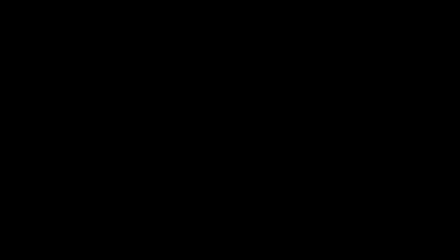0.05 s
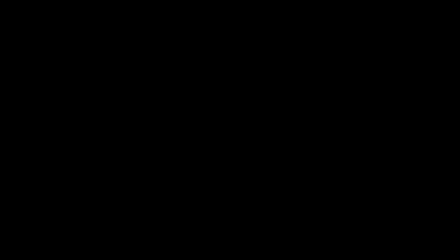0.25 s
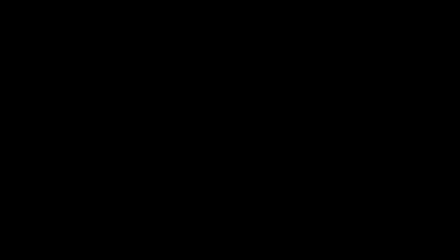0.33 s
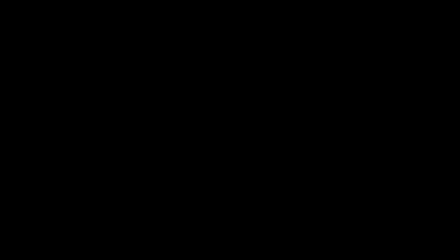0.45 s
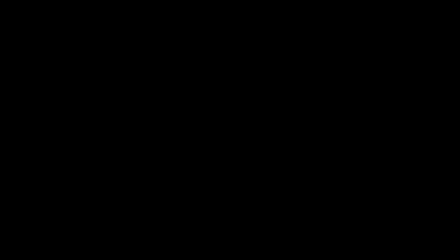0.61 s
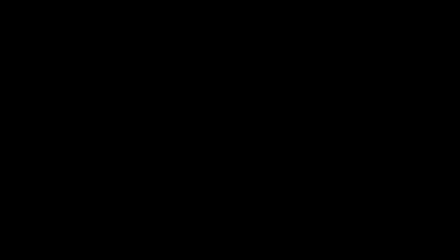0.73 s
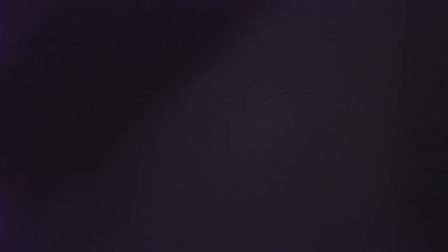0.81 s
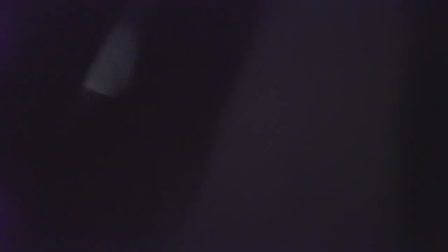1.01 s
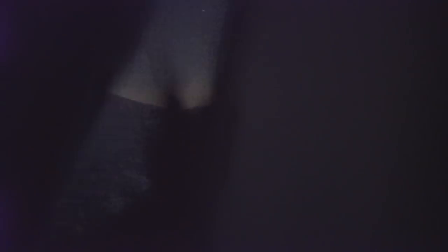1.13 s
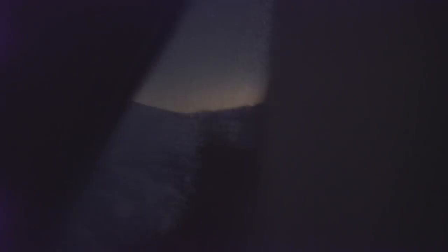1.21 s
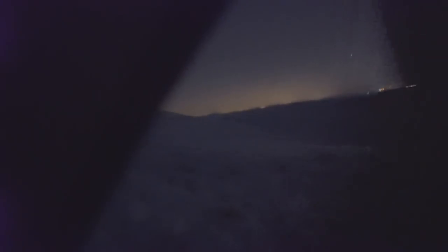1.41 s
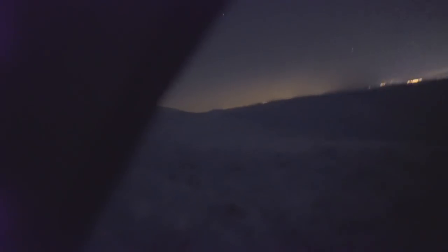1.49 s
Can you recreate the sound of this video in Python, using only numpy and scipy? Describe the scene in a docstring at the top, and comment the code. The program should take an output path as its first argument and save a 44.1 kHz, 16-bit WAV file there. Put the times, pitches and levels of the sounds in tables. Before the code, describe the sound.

Heard up close inside a tent, a zipper opens with a scraping buzz that rises in pitch and ends on a small metallic tick. The door flap then swishes and crinkles twice against a faint, steady hiss.

```python
"""A tent zipper is pulled open close by, faster and louder: the slider scrapes and snaps over the
teeth, the taut fabric buzzes at the tooth rate, and the metal pull tab ticks at the stop.
Then the nylon door is pushed aside in two rustling sweeps, its creases popping.
The tent walls stir and echo briefly. The night is still, with only a faint hiss."""
import sys
import numpy as np
from scipy import signal
from scipy.fft import rfft, irfft, next_fast_len
from scipy.io import wavfile
from scipy.ndimage import map_coordinates

SR = 44100
rng = np.random.default_rng(int(sys.argv[2]) if len(sys.argv) > 2 else 0)


def wrap_up_sound(samples):
    """Save the sound to the file named by the first command line argument, as 16-bit audio."""
    columns = np.atleast_2d(samples).T
    # keep every value between -1 and 1, then stretch to whole-number steps
    tamed = np.clip(columns, -1, 1)
    steps = np.round(tamed * 32767).astype(np.int16)
    wavfile.write(sys.argv[1], SR, steps)


N = 68355

# Noise spectra. Each row: frequency in Hz, relative density in dB.
NIGHT_SPECTRUM = [(25, -26), (70, -18), (150, -24), (500, -5), (1500, -4.5), (4000, -2.5), (11000, 1),
                  (16000, -2.5)]
WALL_SPECTRUM = [(25, -8), (70, 1), (130, 2), (250, 6), (500, -14)]
SWISH_SPECTRUM = [(100, -39), (400, -21), (1000, -13.5), (2000, -4.5), (3300, -1), (5000, 1), (7500, -6),
                  (9500, -11.5), (12000, -5.5), (16000, -18)]
CRUMPLE_SPECTRUM = [(40, -32), (150, -24.5), (350, -9), (700, -6), (1100, 0), (1700, -1), (3000, -5),
                    (6000, -20), (15000, -22)]
SHEEN_SPECTRUM = [(1000, -43), (4500, -9), (7500, -1.5), (11500, -1.5), (14000, -2), (16000, -4.5)]
SCRAPE_SPECTRUM = [(100, -41), (300, -15), (600, -12.5), (1100, -3.5), (2200, -2.5), (3200, -3),
                   (5200, 2.5), (7000, -1.5), (9300, -7), (11400, -0.5), (13000, -5.5), (16000, -9.5)]
# Stereo likeness of the noises. Each row: frequency in Hz, left-right correlation.
NIGHT_CORR = [(150, 1), (2000, 0.17), (9000, 0.079)]
WALL_CORR = [(100, 0.99)]
SWISH_CORR = [(500, 1), (2500, 0.74), (6000, 0.46), (12000, 0.1)]
CRUMPLE_CORR = [(200, 1), (1500, 0.85), (6000, 0.21)]
SHEEN_CORR = [(5000, 0.16), (12000, 0.14)]
SCRAPE_CORR = [(500, 1), (2000, 0.25), (5000, 0.17), (9000, 0.11), (15000, 0.22)]
# Stereo width of tent echo and tooth clicks. Each row: frequency in Hz, side gain in dB.
ECHO_WIDTH = [(150, -27), (600, 0.5), (2000, -2)]
CLICK_WIDTH = [(400, -11), (1000, -47), (2000, -6), (4000, -18), (10000, 3.5)]
# Position of zipper and door. Each row: time in seconds, left minus right in dB.
NEAR_PAN = [(0, 2), (.3, 1.5), (.45, 1), (.65, -0.8), (.75, -2), (.83, -2), (.93, -1.5), (1.12, 1.5),
            (1.2, -3), (1.31, -7), (1.48, -7), (1.55, -4)]

# Stir of the tent wall. Each row: time in seconds, level in dB.
WALL_LEVELS = [(0, -94), (.13, -96), (.2, -83), (.42, -79), (.5, -78), (.75, -63), (1.0, -67), (1.08, -89),
               (1.2, -86), (1.33, -96), (1.5, -68)]
# Tugs on the wall. Each row: centre in seconds, level in dB, half-width in seconds.
WALL_TUGS = [(0.554, -61, .02), (.715, -58, .012), (0.78, -75, .012), (0.922, -61, .007),
             (0.996, -71, 0.018), (1.274, -67, 0.0092)]
# Decay inside the tent. Each row: frequency in Hz, T60 in seconds.
TENT_DECAY = [(300, 0.093), (2000, 0.069), (10000, 0.034)]
# Door sweeps. Each row: time in seconds, then swish, crumple and sheen levels in dB.
DOOR_LEVELS = [(.79, -59, -23, -55), (.825, -41.5, -39, -39), (.875, -49, -49, -41), (.90, -43, -45, -40.5),
               (.925, -39.5, -36.5, -35), (.965, -34, -38.5, -37), (1.0, -31.5, -36.5, -34),
               (1.035, -33, -55, -42), (1.06, -31, -42.5, -41), (1.12, -34, -47.5, -37.5),
               (1.15, -28, -43.5, -33), (1.172, -40.5, -76, -33.5), (1.195, -36.5, -65, -35),
               (1.23, -53, -48.5, -46.5), (1.3, -61, -68, -73), (1.38, -51.5, -56, -49),
               (1.43, -44.5, -49.5, -40.5), (1.46, -43.5, -47.5, -36), (1.495, -36.5, -41.5, -32.5),
               (1.52, -39, -44, -36), (1.55, -42.5, -44.5, -35.5)]
# Snapping creases. Each row: start in seconds, peak in dB, centre in Hz, half-width in octaves.
CREASE_POPS = [(.832, -26, 2430, 0.45), (.862, -25.5, 1270, 0.69), (.898, -32, 2600, 0.93),
               (0.903, -34, 2170, 0.8), (0.913, -43, 305, 1.06), (.919, -26, 1550, 0.47),
               (0.9333, -23, 3560, 1.5), (.971, -23, 1600, 1.3), (1.102, -23, 3200, 0.88),
               (1.134, -23, 3750, 0.4), (1.268, -48, 533, 0.42), (1.316, -51, 1170, 0.25),
               (1.407, -33, 1500, 1.2), (1.439, -28.5, 1750, .7), (1.474, -25.5, 2510, 1.2),
               (1.489, -29, 2380, 1.1), (1.504, -33, 2010, 0.5)]

# Pull tab strikes. Each row: start in seconds, peak in dB, left minus right in dB.
TAB_STRIKES = [(.8072, -16, -15), (0.812, -22, 13), (0.8154, -27, 4)]
# Pull tab modes. Each row: frequency in Hz, relative level in dB, T60 in seconds.
TAB_RING = [(11270, -9.5, 0.03), (11500, -0.5, 0.011), (12150, -4.5, 0.01)]
# Fabric buzz. Each row: time in seconds, fundamental in dB, overtones in dB.
BUZZ_LEVELS = [(0, -60, -45), (.05, -70, -50.5), (.095, -55, -40), (.16, -47.5, -58), (.20, -41.5, -38.5),
               (.228, -44.5, -36), (.265, -47, -38.5), (.34, -44, -39.5), (.405, -46, -31.5),
               (.46, -49, -29.5), (.505, -35, -25.5), (.545, -42, -51), (.585, -46, -41),
               (.615, -33, -27.5), (.67, -30, -28), (.705, -28, -26.5), (.734, -23.5, -23),
               (.757, -33, -34), (.785, -30.5, -23.5), (.80, -26.5, -25), (.818, -53, -35.5)]
# Resonances of fabric, tooth on tape, tooth on slider. Each row: frequency in Hz, relative gain in dB.
BUZZ_BODY = [(500, -7), (700, -4), (900, 4), (1100, 3), (1400, 1.5), (1750, -4), (2200, -8), (2700, -2),
             (3400, 0.5), (4200, -2.5), (5200, -12), (6000, -27)]
KNOCK_BODY = [(100, -64), (250, -34), (450, -22), (650, -13.5), (900, -3.5), (1150, -6.5), (1500, 0),
              (2100, 2.5), (2800, -4.5), (4000, -12), (7000, -17.5), (16000, -32)]
SNAP_BODY = [(100, -55), (700, -8.5), (2000, -14), (3100, -5.5), (4100, 4.5), (5200, -2), (7000, -7),
             (9000, -14), (11500, -22), (16000, -16)]
# Unevenness of the teeth. Each row: time in seconds, rms timing scatter in ms.
TOOTH_SCATTER = [(0, .05), (.39, .055), (.44, .16), (.57, .15), (.63, .09), (.69, .045), (.74, .033),
                 (.8, .024)]
# Slider speed. Each row: time in seconds, teeth per second.
TOOTH_RATE = [(0.0, 290), (0.036, 355), (0.084, 367), (0.114, 437), (0.142, 476.2), (0.166, 430),
              (0.196, 329), (0.23, 399), (0.278, 292), (0.334, 420.1), (0.412, 517), (0.448, 365),
              (0.492, 500), (0.506, 429), (0.576, 380), (0.606, 399), (0.64, 568), (0.666, 531.4),
              (0.694, 700), (0.712, 714.6), (0.734, 917), (0.788, 823.9), (0.804, 680), (0.808, 641.9),
              (0.814, 550), (0.82, 210)]
# The pull. Each row: time in seconds, then knock, snap and scrape levels in dB.
PULL_LEVELS = [(0, -41.5, -73, -37.5), (.13, -39, -45, -34), (.24, -59, -43, -30.5), (.31, -36, -43, -29.5),
               (.37, -39.5, -37, -26.5), (.41, -39, -35, -24.5), (.46, -32, -41, -22.5),
               (.51, -27.5, -27, -22.5), (.55, -25, -24, -23), (.60, -22.5, -23, -27.5),
               (.645, -25, -23, -20), (.675, -25, -19, -24), (.725, -25.5, -19.5, -25.5),
               (.755, -33, -23.5, -23), (.775, -27.5, -19.5, -24.5), (.795, -20, -34, -20),
               (.806, -33.5, -44, -25), (.83, -36, -49, -69)]


def amp(db):
    """Decibels to gain."""
    return 10 ** (np.asarray(db) / 20)


def unit_rms(x):
    """Scale to rms 1."""
    return x / np.sqrt(np.mean(x ** 2) + 1e-20)


def at_hz(rows, hz):
    """Interpolate a table over log frequency."""
    knots_hz, values = np.transpose(rows)
    return np.interp(np.log(hz + 1), np.log(knots_hz + 1), values)


def curves(rows):
    """One value per sample for each column after the time."""
    knots_s, *columns = np.transpose(rows)
    return [np.interp(np.arange(N) / SR, knots_s, column) for column in columns]


def wobble(rate_hz):
    """Smooth random curve, rate_hz knots a second."""
    return map_coordinates(rng.standard_normal(4096), [np.arange(N) * rate_hz / SR + 2], mode="wrap")


def filtered(x, response):
    """Apply a frequency response."""
    size = next_fast_len(N + SR // 2)
    return irfft(rfft(x, size) * response(np.fft.rfftfreq(size, 1 / SR)), size)[..., :N]


def minimum_phase(db):
    """Response with these gains that rings only after the blow."""
    cepstrum = irfft(np.log(amp(db)))
    half = len(cepstrum) // 2
    return np.exp(rfft(np.r_[cepstrum[0], 2 * cepstrum[1:half], np.zeros(half)]))


def pan_gains(db):
    """Left and right gains for a level difference."""
    return amp(np.array([db, -db]).reshape(2, -1) / 2)


def stereo(mid, side):
    """Mid and side to left and right."""
    return np.array([mid + side, mid - side])


def noise(spectrum, correlation, grain=1):
    """Stereo noise of rms 1, broken into grains, then coloured."""
    def response(hz):
        angle = np.arccos(np.clip(at_hz(correlation, hz), -1, 1)) / 2
        return amp(at_hz(spectrum, hz)) * [np.cos(angle), np.sin(angle)]
    return unit_rms(stereo(*filtered(grain * rng.standard_normal((2, N)), response)))


def add(out, start_s, x):
    """Mix x into out from start_s on."""
    part = out[..., round(start_s * SR):][..., :x.shape[-1]]
    part += x[..., :part.shape[-1]]


def night_hiss(level_db=-44.5):
    """Faint, steady hiss."""
    return amp(level_db) * noise(NIGHT_SPECTRUM, NIGHT_CORR)


def wall():
    """The tent wall stirs and thumps softly at each tug."""
    t = np.arange(N) / SR
    tugs = sum(amp(db) * np.exp(-((t - centre_s) / width_s) ** 2) for centre_s, db, width_s in WALL_TUGS)
    stir = amp(curves(WALL_LEVELS)[0] + 2.522 * wobble(22.3))
    return (stir + tugs) * noise(WALL_SPECTRUM, WALL_CORR)


def tent_echo(x, level_db=-11):
    """Brief reflections off the walls; treble dies first."""
    hz, t, bins = signal.stft(rng.standard_normal((2, SR // 5)), SR, nperseg=128)
    decay = amp(-60 * t / at_hz(TENT_DECAY, hz)[:, None])
    tail = signal.istft(bins * decay, SR, nperseg=128)[1]
    mid, side = signal.fftconvolve(x.mean(axis=0)[None], tail / np.linalg.norm(tail), axes=1)[:, :N]
    side = filtered(side, lambda hz: amp(at_hz(ECHO_WIDTH, hz)))
    return amp(level_db) * stereo(mid, side)


def fold_echoes(x, t60_s, drift_hz, count=14):
    """Very short echoes off nearby fabric, drifting between random paths."""
    t = np.arange(SR // 100) / SR
    paths = rng.standard_normal((count, len(t))) * amp(-60 * t / t60_s)
    shares = np.array([wobble(drift_hz) for _ in paths])
    shares /= np.linalg.norm(shares, axis=0)
    return sum(share * signal.fftconvolve(x, path / np.linalg.norm(path))[:N]
               for share, path in zip(shares, paths))


def door(onset_s=0.013):
    """Nylon slides on nylon with a swish and a sheen of fine hiss; its folds crumple."""
    swish_db, crumple_db, sheen_db = curves(DOOR_LEVELS)
    swish = noise(SWISH_SPECTRUM, SWISH_CORR, grain=amp(3 * wobble(1800) + 0.87 * wobble(130)))
    crumple = noise(CRUMPLE_SPECTRUM, CRUMPLE_CORR, grain=amp(3.1 * wobble(900) + 2.1 * wobble(120)))
    sheen = noise(SHEEN_SPECTRUM, SHEEN_CORR, grain=amp(2.5 * wobble(2500)))
    fade_in = np.clip((np.arange(N) / SR - DOOR_LEVELS[0][0]) / onset_s, 0, 1)
    return fade_in * (amp(swish_db) * swish + amp(crumple_db) * crumple + amp(sheen_db) * sheen)


def creases(skirt_db=-12, echo_db=-5):
    """Single creases pop through, each at its own pitch."""
    pops, hz = np.zeros(N), np.fft.rfftfreq(2048, 1 / SR)
    for start_s, db, centre_hz, width_oct in CREASE_POPS:
        detune = np.log2((hz + 1) / centre_hz) / width_oct
        pop = irfft(minimum_phase(skirt_db * np.log2(1 + detune ** 2)))
        add(pops, start_s, amp(db) * pop / np.abs(pop).max())
    echoes = np.array([fold_echoes(pops, t60_s=0.011, drift_hz=11.98) for _ in range(2)])
    return pops + amp(echo_db) * echoes


def pull_tab(attack_s=0.00025):
    """The metal tab chatters against the stopping slider."""
    out, t = np.zeros((2, N)), np.arange(SR // 20) / SR
    for start_s, db, pan_db in TAB_STRIKES:
        ring = sum(amp(mode_db - 60 * t / t60_s) * np.sin(2 * np.pi * (hz * t + rng.random()))
                   for hz, mode_db, t60_s in TAB_RING)
        ring *= 1 - np.exp(-t / attack_s)
        add(out, start_s, amp(db) * pan_gains(pan_db) * ring / np.abs(ring).max())
    return out


def fabric_buzz(rate_hz, teeth, harmonics=6, flutter_db=3, rough_rad=0.2):
    """Taut fabric buzzes at the tooth rate; overtones glide through its resonances."""
    fundamental_db, overtones_db = curves(BUZZ_LEVELS)
    orders = np.arange(1, harmonics + 1)
    partials = []
    for k in orders:
        flutter = amp(flutter_db * wobble(54.82))
        phase = 2 * np.pi * (k * teeth + rng.random()) + rough_rad * np.sqrt(k) * wobble(108.7)
        partials.append(flutter * np.sin(phase))
    gains = amp(at_hz(BUZZ_BODY, orders[1:, None] * rate_hz))
    overtones = np.sum(gains * partials[1:], axis=0) / np.linalg.norm(gains, axis=0)
    return amp(fundamental_db) * unit_rms(partials[0]) + amp(overtones_db) * unit_rms(overtones)


def tooth_clicks(teeth, spread_db=1.53):
    """One impulse per tooth, slightly uneven in time and size."""
    at = np.interp(np.arange(1, teeth[-1]), teeth, np.arange(N))
    late, size = rng.standard_normal((2000, 2))[:len(at)].T
    scatter_ms = curves(TOOTH_SCATTER)[0][at.astype(int)]
    at += late * scatter_ms * SR / 1000
    taps = at.astype(int)[:, None] + np.arange(-7, 9)
    offset = taps - at[:, None]
    pulses = np.sinc(offset) * np.sinc(offset / 8)  # sub-sample timing
    pulses *= amp(spread_db * size)[:, None]
    train = np.bincount(np.clip(taps, 0, N).ravel(), pulses.ravel(), N + 1)[:N]
    return train / np.sqrt(np.gradient(teeth))  # power independent of speed


def tooth_ring(train, body, lag_s=0, smear_s_per_hz=6e-8, echo_db=-9):
    """Clicks ring a body and echo off the folds; the tape delays their treble."""
    def response(hz):
        delay_s = lag_s + smear_s_per_hz * hz / 2
        return minimum_phase(at_hz(body, hz)) * np.exp(-2j * np.pi * hz * delay_s)
    direct = filtered(train, response)
    mid = direct + amp(echo_db) * fold_echoes(direct, t60_s=0.0032, drift_hz=21.94)
    side = fold_echoes(direct, t60_s=0.0037, drift_hz=14.08)
    side = filtered(side, lambda hz: amp(at_hz(CLICK_WIDTH, hz)))
    return unit_rms(stereo(mid, side))


def zipper(stop_s=0.835, fade_s=0.019):
    """Each tooth knocks on the tape, snaps on the slider and pulses the scrape; the fabric buzzes."""
    rate_hz, = curves(TOOTH_RATE)
    teeth = np.cumsum(rate_hz) / SR  # teeth passed so far
    knock_db, snap_db, scrape_db = curves(PULL_LEVELS)
    train = tooth_clicks(teeth)
    knock = amp(knock_db) * tooth_ring(train, KNOCK_BODY)
    snap = amp(snap_db) * tooth_ring(train, SNAP_BODY, lag_s=0.00015)
    grain_db = -5 * (teeth % 1) + 1.3 * wobble(1500)
    scrape = amp(scrape_db) * noise(SCRAPE_SPECTRUM, SCRAPE_CORR, grain=amp(grain_db))
    moving = np.clip((stop_s - np.arange(N) / SR) / fade_s, 0, 1)
    return moving * (knock + snap + scrape + fabric_buzz(rate_hz, teeth))


def scene():
    """Zipper and door in the tent, over the wall's low stir and a faint hiss."""
    near = (zipper() + door() + creases()) * pan_gains(curves(NEAR_PAN)[0]) + pull_tab()
    return near + tent_echo(near) + wall() + night_hiss()


def record(dry):
    """Brick-wall low-pass."""
    cutoff_hz = 15900
    return filtered(dry, lambda hz: hz < cutoff_hz)


dry = scene()
out = record(dry)
wrap_up_sound(out)
```